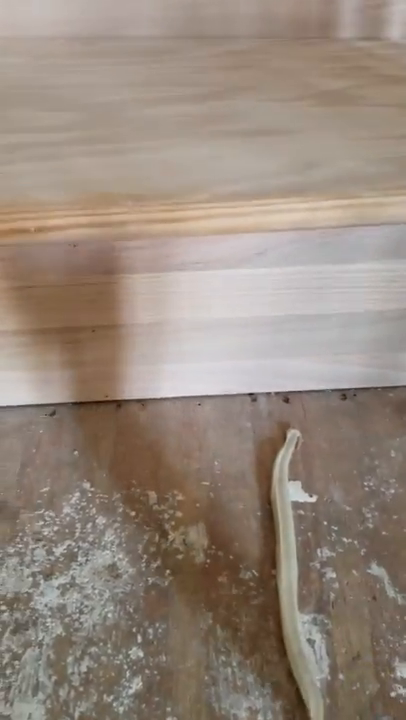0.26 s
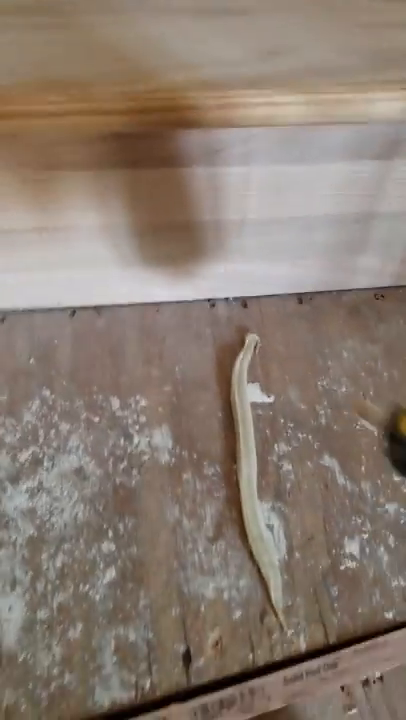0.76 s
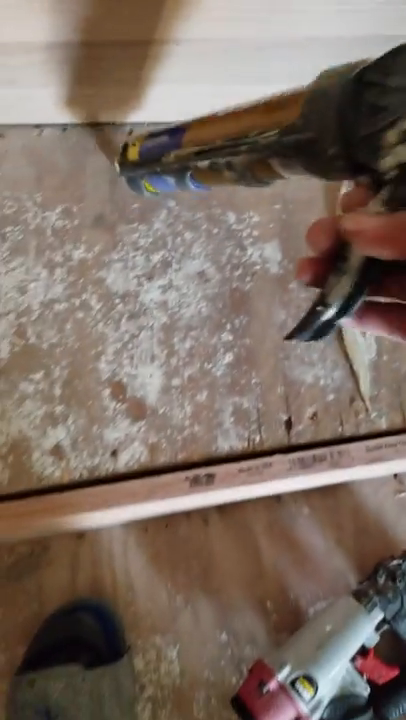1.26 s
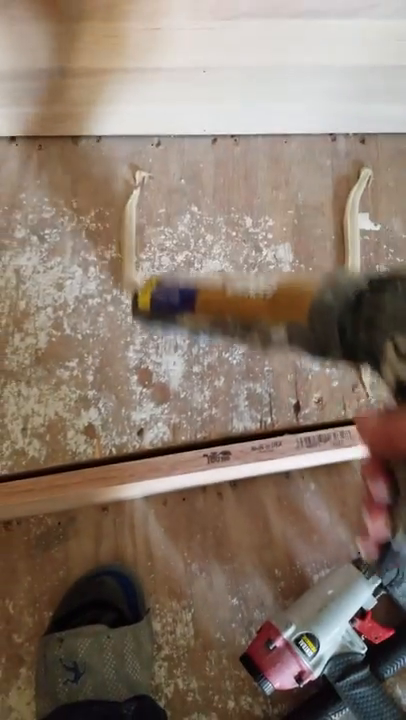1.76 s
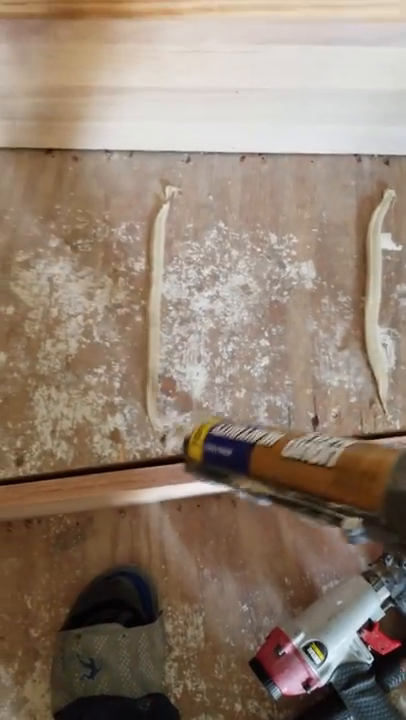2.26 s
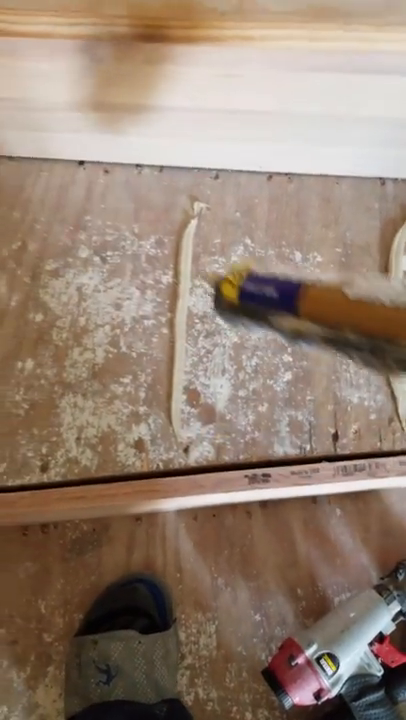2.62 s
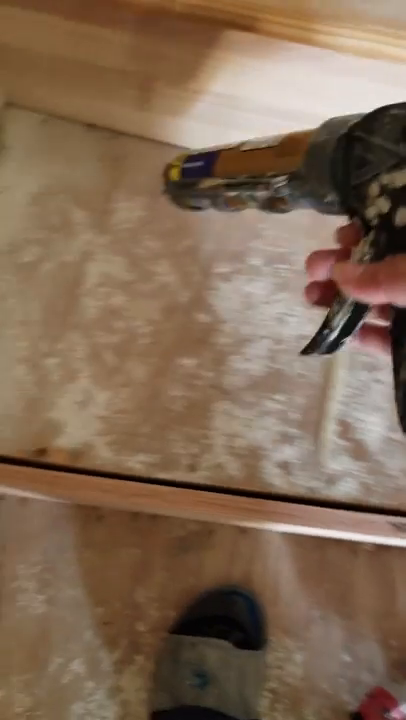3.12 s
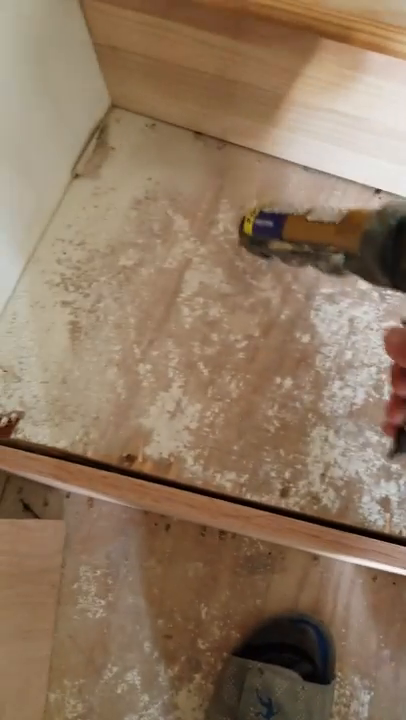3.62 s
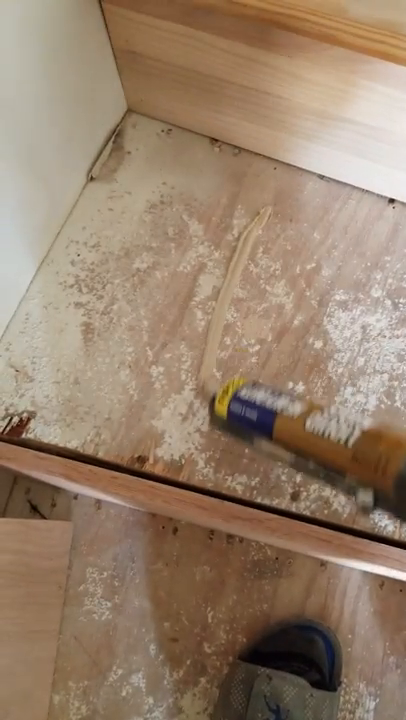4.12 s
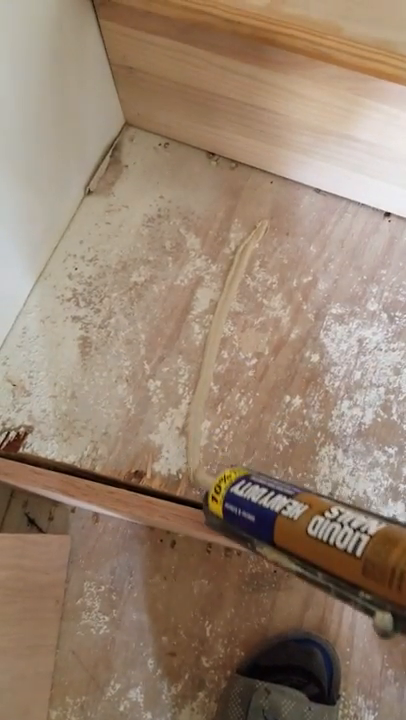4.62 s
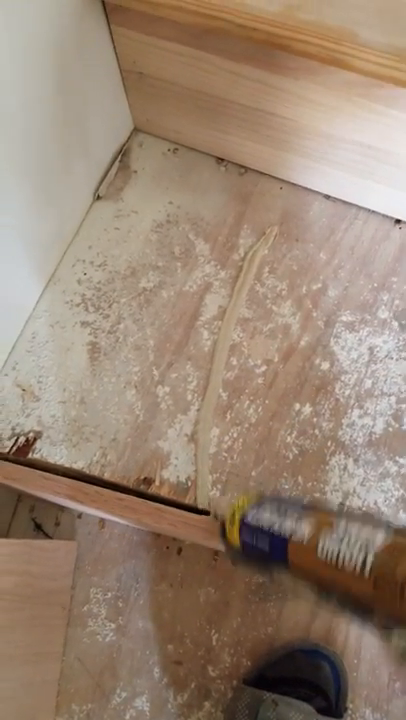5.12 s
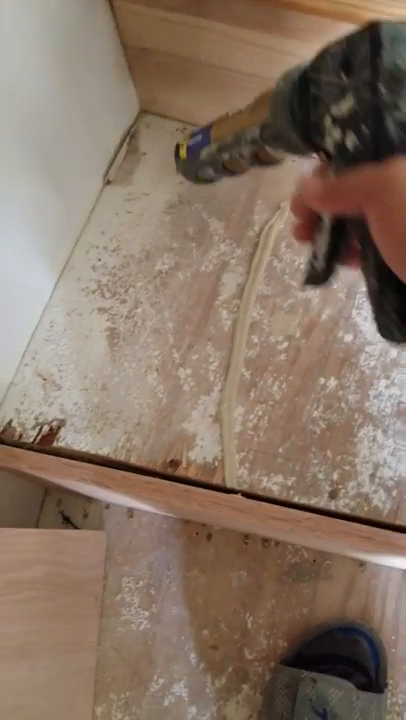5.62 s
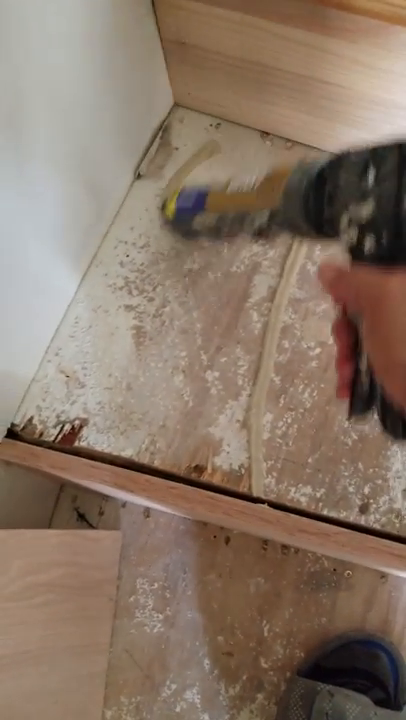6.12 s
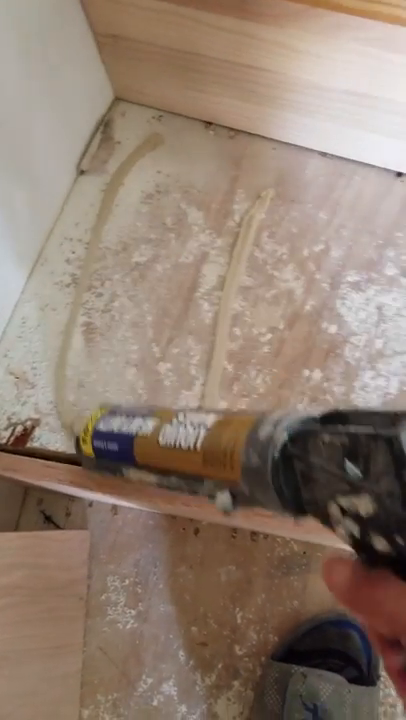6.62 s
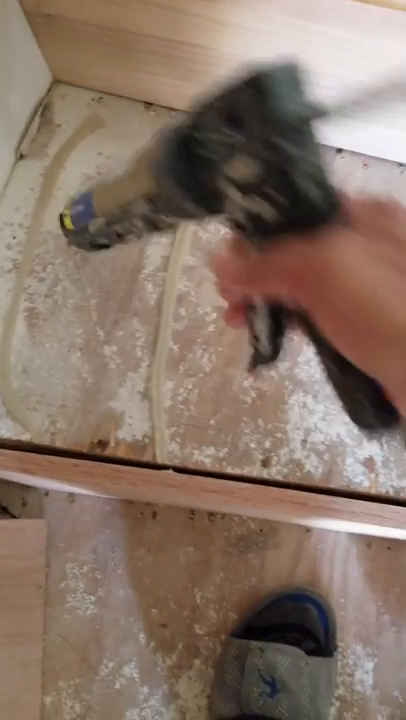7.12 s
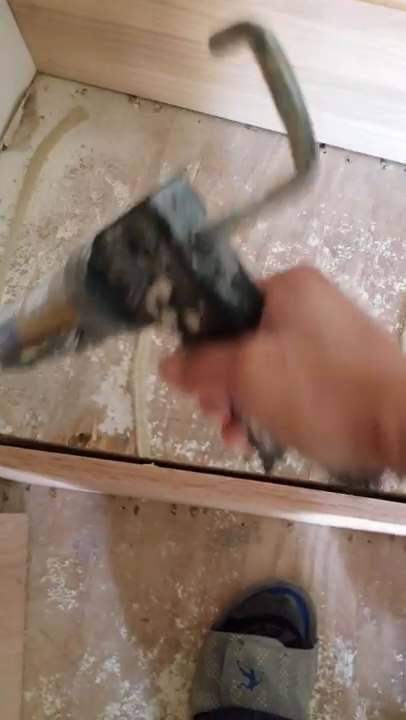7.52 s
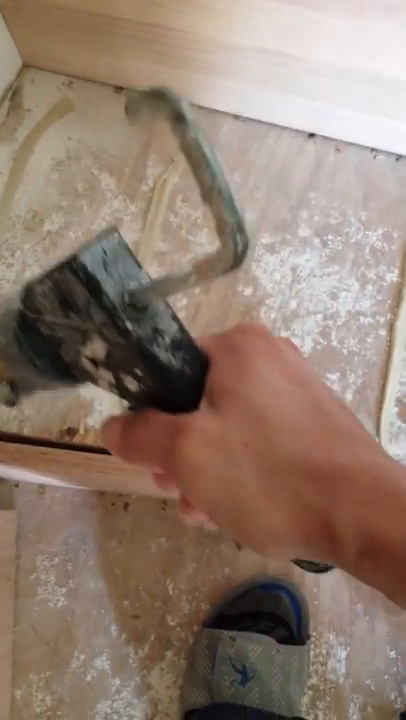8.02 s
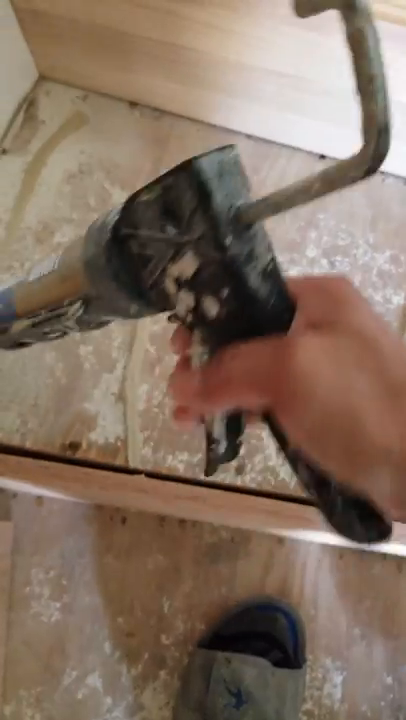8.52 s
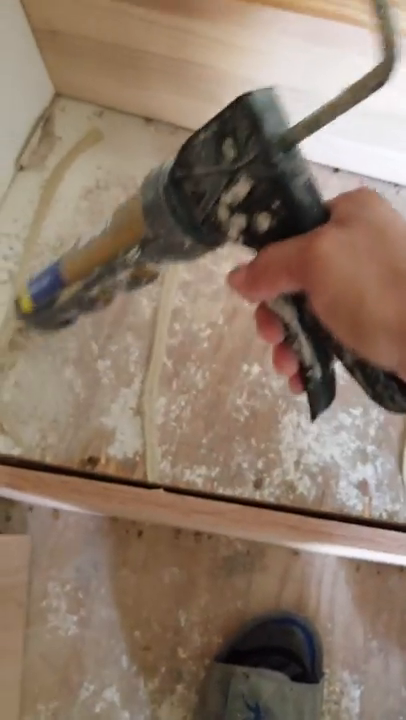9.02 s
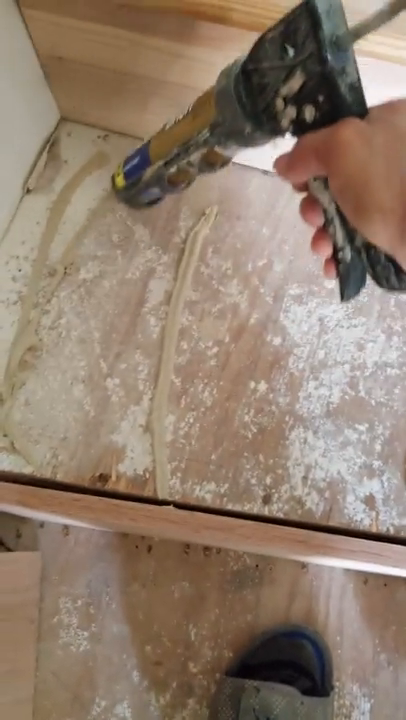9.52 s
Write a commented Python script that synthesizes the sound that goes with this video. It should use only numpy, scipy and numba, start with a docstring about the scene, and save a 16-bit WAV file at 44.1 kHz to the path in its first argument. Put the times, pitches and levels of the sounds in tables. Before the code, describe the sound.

A caulking gun is squeezed again and again in a small bare room, creaking in jerks between sharp metallic clicks, over low machine rumble and airy hiss.

```python
"""Caulking gun squeezed over a wooden floor in a small bare room, 9.8 s, heard by a phone with two microphones.
Throughout: far machine rumble and leaking-air hiss (shaped noise), the gun bumping the boards (dull bursts),
light metal ticks with faint scrapes. 0 s: a creak dies; 0.28 s: a bright snap (rattling noise rings steel modes).
From 1.36, 3.44, 5.78, 7.17 and 8.6 s: pulls; the plunger creaks in stick-slip jerks (scrapes ring the gun's
parts), the pawl clicks over a tooth; more snaps from 2.19 to 8.41 s, mostly the trigger against its stops."""
import sys
import numpy as np
from scipy import signal
from scipy.fft import rfft, irfft, next_fast_len
from scipy.io import wavfile
from scipy.ndimage import uniform_filter1d
from numba import njit

SR = 44100
rng = np.random.default_rng(int(sys.argv[2]) if len(sys.argv) > 2 else 0)


def generate_wav(signal):
    """Clip the signal to [-1, 1] and save it as 16-bit WAV at the path in sys.argv[1]."""
    frames = np.transpose(np.atleast_2d(signal))
    scaled = np.clip(frames, -1, 1) * 32767
    pcm = np.round(scaled).astype(np.int16)
    wavfile.write(sys.argv[1], SR, pcm)


N = 430416

# Levels are nominal: stage gains, the room and the output curve follow. Spectra are dB per Hz, relative.
# Rumble and hiss over time: time_s, rumble_db, hiss_db, hiss_peak_db, hiss_peak_hz
AIR = [(0.0, -56.5, -56, -53, 11500), (1.3, -53, -66, -49.5, 11160), (1.66, -46, -54, -44.5, 11200),
       (2.42, -50.5, -60, -47.5, 11070), (3.18, -48, -60.5, -47.5, 11000), (3.53, -44, -53, -51, 11900),
       (4.9, -47, -57.5, -51.5, 11860), (6.17, -50, -61, -52, 10600), (6.93, -53, -60, -60, 10800),
       (7.69, -49.5, -61.5, -59, 11370), (9.08, -49, -56.5, -67, 11100), (9.76, -49, -59.5, -62, 11500)]
# Rumble spectrum: freq_hz, density_db
RUMBLE_SPECTRUM = [(12, -58), (20, -24), (69, -5), (91, -6.5), (123, -1), (133, -3.5), (146, -5),
                   (172, -19.5), (248, -23), (300, -21), (399, -28), (507, -30.5), (624, -46), (767, -49),
                   (900, -68.5), (1170, -90), (1980, -120)]
# Wavering tones in the rumble: freq_hz, width_hz, level_db
HUM = [(80.7, 7.9, -9.5), (121.34, 3.5, -4), (136.2, 10.6, -8)]
# Hiss spectra, three bands: freq_hz, density_db
LOW_HISS_SPECTRUM = [(410, -44), (700, -10), (1140, -15), (1190, -9), (1790, -4), (3070, -9.5), (3160, -21),
                     (4000, -11.5), (4850, 1), (6330, -11.5), (8000, -33.5), (10400, -7), (17600, -120)]
MID_HISS_SPECTRUM = [(7000, -72), (7600, -11), (9000, -4), (10000, -1), (11500, -1.5), (12500, -12),
                     (13500, -32)]
HIGH_HISS_SPECTRUM = [(11500, -31), (12800, -4), (13800, -13), (15000, 0), (15650, -15), (15900, -56)]
# Side of the low hiss: freq_hz, left_minus_right_db
LOW_HISS_SIDES = [(700, -0.5), (1700, 6), (3500, 1.5), (5000, -6), (7000, 15)]
# Likeness of the two channels of noise: freq_hz, correlation (0..1)
LIKENESS = [(60, 1), (130, 0.93), (290, 0.8), (640, 0.59), (1400, 0.18), (3000, 0.025), (15000, 0.02)]
# Decay of the room: freq_hz, t60_s
ROOM_T60 = [(200, 0.62), (1000, 0.63), (3000, 0.6), (6000, 0.59), (12000, 0.31)]
# Nozzle and barrel against the boards: start_s, peak_db, t60_s
BUMPS = [(0.02, -44.5, 0.3), (0.257, -40.5, 0.067), (1.294, -39, 0.064), (1.305, -29, 0.11),
         (2.16, -36.5, 0.049), (3.182, -34, 0.31), (3.378, -23, 0.21), (5.069, -38, 0.19),
         (5.74, -37, 0.38), (5.796, -33.5, 0.069), (5.827, -31, 0.25), (7.248, -39, 0.13),
         (7.507, -38, 0.19), (7.995, -41.5, 0.05), (8.01, -39, 0.062), (8.217, -47.5, 0.12),
         (8.408, -45.5, 0.093), (8.718, -28, 0.11), (9.002, -41, 0.05), (9.016, -34.5, 0.21),
         (9.289, -41.5, 0.093), (9.365, -40.5, 0.05), (9.703, -39, 0.26)]
# Board spectrum: freq_hz, density_db
BOARD_SPECTRUM = [(110, -7.5), (190, -18.5), (227, -1), (291, 5), (356, -1), (550, -8), (700, -13.5),
                  (1090, -19.5), (1300, -24.5), (1690, -19), (2860, -120)]
# Light metal ticks and faint scrapes, some just before a snap: start_s, peak_db, scrape_s
TICKS = [(0.2529, -25.5, .036), (.543, -41, 0.023), (0.714, -46, .014), (1.306, -30, 0.037),
         (1.352, -27.5, 0.09), (2.16, -20.5, 0.064), (3.379, -24.5, .045), (3.439, -20.5, 0.085),
         (5.027, -23, 0.093), (5.071, -15.5, 0.024), (5.744, -32, 0.056), (5.777, -26.5, 0.11),
         (5.827, -21, 0.0064), (6.776, -30, 0.058), (7.176, -31.5, 0.037), (8.246, -33, 0.012),
         (8.391, -28.5, 0.098), (8.601, -28.5, 0.07), (9.754, -26, .026)]
# Tick spectrum: freq_hz, density_db
TICK_SPECTRUM = [(410, -39), (700, -13), (1250, -7.5), (1530, 3.5), (2320, 0.5), (2840, -2.5), (4640, -9.5),
                 (7270, -23.5), (9000, -14), (11700, -59), (19800, -120)]
# Broad bright snaps, mostly the trigger against its stops; 7.32 s may be the pawl: start_s, peak_db,
# left_minus_right_db, rattle_s, body_db, treble_db, ring_db (modes over 4.5 kHz)
SNAPS = [(.2791, -7, -5.5, 0.0034, 6, 15.6, -14), (2.1898, -4, -7.5, .0038, 2, 11, -23),
         (5.047, -4, -1.5, 0.0031, -2, 10.5, 7), (6.8019, -4.5, 1.5, 0.0042, -5, 1.3, -4.5),
         (6.8298, -6.5, -3, 0.00063, 0, 5.9, 6), (7.3186, -8, -0.5, 0.0042, -0.5, 11.3, -15),
         (8.4117, -5, -1, 0.0044, 5, 13, 7)]
# Snap spectrum: freq_hz, density_db
SNAP_SPECTRUM = [(180, -55), (300, -21.5), (898, -19), (1700, -0.5), (2830, -1), (4170, -4), (5020, -0.5),
                 (5940, -8), (7910, -11.5), (10400, -7.5), (14300, -11.5), (15500, -16), (16900, -34.5)]
# Snap modes: freq_hz, level_db, t60_s
SNAP_MODES = [(1600, -1.5, 0.0058), (2870, 2, 0.015), (4860, -29.5, 0.011), (10570, -4, 0.028)]
# Pawl over a tooth: columns as SNAPS
PAWL = [(1.7638, -4, -5, 0.0031, 1.5, 3, 1.5), (3.8258, -3, -3, 0.0023, -3.5, 4, 1),
        (6.0053, -5.5, -3, 0.0031, 1, 5.5, 2.5), (8.1104, -4.5, -.5, 0.0037, 2.5, 6, -9),
        (9.1453, -6, 0, 0.0033, -2, 2.5, -33)]
# Pawl spectrum: freq_hz, density_db
PAWL_SPECTRUM = [(350, -57), (600, -27.5), (1750, -15.5), (2340, -3), (2870, -11.5), (4520, -10.5),
                 (5260, -10.5), (6730, -17), (8160, -11.5), (10700, -20.5), (11700, -8), (16000, -27.5)]
# Pawl modes: freq_hz, level_db, t60_s
PAWL_MODES = [(2284, 8, 0.033), (2950, -14, 0.027), (4210, -13, 0.018), (5080, -4.5, 0.0093),
              (5263, 12, 0.014), (8400, -1, 0.015), (10300, 8, 0.015), (12000, -2, 0.032)]
# Dense creak, one list a pull: time_s, effort_db (frame level), tube_pitch_hz
CREAK = [
    [(0.0, -51.5, 1410), (.1, -61.5, 1430), (.15, -87, 1420)],
    [(1.36, -57, 1610), (1.49, -48, 1490), (1.668, -46.5, 1450), (1.776, -48.5, 1380), (1.922, -50, 1450),
     (2.0, -81.5, 1400)],
    [(3.44, -60, 1620), (3.55, -50.5, 1590), (3.742, -44.5, 1470), (3.922, -48.5, 1405), (4.162, -62, 1394),
     (4.33, -63, 1410)],
    [(5.78, -55, 1450), (5.94, -48, 1384), (6.146, -53, 1415), (6.256, -55, 1450), (6.416, -61, 1456),
     (6.62, -58.5, 1440)],
    [(7.17, -56.5, 1530), (7.236, -59.5, 1600), (7.53, -58, 1635), (7.7, -59, 1545), (7.73, -70, 1490),
     (7.768, -58.5, 1500), (7.926, -55.5, 1463), (7.99, -78.5, 1540), (8.1, -61, 1450), (8.2, -66, 1470)],
    [(8.6, -54, 1550), (8.77, -54, 1700), (8.88, -56.5, 1640), (8.92, -54.5, 1440), (9.022, -52, 1440),
     (9.124, -53, 1510), (9.32, -53.5, 1445), (9.428, -73, 1460), (9.562, -56.5, 1470), (9.62, -68, 1430)],
]
# Lone slips where the plunger slows: start_s, peak_db
SLIPS = [(1.922, -55), (3.9948, -52), (4.0194, -45), (4.058, -46.5), (4.0887, -50), (4.12, -44),
         (4.147, -46.5), (4.179, -46.5), (4.2066, -45), (4.2288, -45.5), (4.2473, -45), (4.2838, -43.5),
         (4.3764, -43.5), (4.5626, -54), (4.604, -44), (4.6258, -46), (6.3225, -49), (6.377, -50),
         (6.4107, -49), (6.4425, -49), (6.4636, -49), (6.537, -52.5), (6.601, -49.5), (7.2105, -51),
         (7.268, -51), (7.476, -52), (7.6784, -54), (7.698, -52), (7.741, -49.5), (7.815, -51),
         (7.942, -49), (8.0124, -45.5), (8.034, -46), (8.0595, -53), (8.081, -46.5), (9.0523, -60),
         (9.405, -45), (9.465, -43.5), (9.507, -49), (9.5333, -50.5), (9.5662, -48), (9.5987, -49)]
# Upper frame modes: freq_hz, width_hz, level_db
FRAME_MODES = [(3110, 160, -8.5), (4130, 540, 0), (5430, 195, -1), (5780, 590, -9.5)]
# Swell of the low parts under full strain: peak_s, half_length_s, grip_db, barrel_db
STRAIN = [(1.805, .4, -62, -52), (3.826, 0.3, -66, -47), (6.286, 0.5, -57.5, -50.5), (7.95, 0.42, -57, -92),
          (9.2, 0.56, -57, -60.5)]
# Tube level change as each full pull starts: change_db
SLACK_TUBE_DB = [-22, 8, -4, 5, 0]

# air
LOW_HISS_DB, HIGH_HISS_DB = -6, 0.5
HISS_SIDE_DB, HISS_SIDE_FIRST_DB, TURN_S = -6.5, -3, 1   # left minus right; extra at first, until the phone turns
FLOOR_ECHO_S, ECHO_SWAY_S, ECHO_DB = .003, .00008, -13
# room and output
ROOM_DB, CUTOFF_HZ = -7.5, 16100
CLACK_SEND_DB = -4   # clacks reach the walls more weakly than the soft sounds
# contacts: crest is peak over rms at the start
CLACK_CREST_DB, TICK_CREST_DB, BUMP_CREST_DB = 11.5, 15.5, 8.5
TICK_RATTLE_S, TICK_BRIGHT_DB = 0.0031, 7.5
# resonant parts
TUBE_WIDTH_HZ, BARREL_HZ, BARREL_WIDTH_HZ = 116, 335, 128
ROD_HZ, ROD_WIDTH_HZ, CRADLE_HZ, CRADLE_WIDTH_HZ = 2273, 250, 2855, 420
GRIP_HZ, GRIP_WIDTH_HZ = 1050, 145
TUBE_DB, ROD_DB, CRADLE_DB = -0.5, -1, -3.5   # against the frame, once loaded
# load and effort
LOADED_HZ = 1500   # the tube's pitch falls through this as the load comes on
LOAD_ROD_DB, LOAD_CRADLE_DB, LOAD_GRIP_DB = 0.5, -3, 2   # per 100 Hz of fall
SLIPS_PER_S, FULL_EFFORT_DB = 95, -48   # slip rate at full effort
SLIP_RATE_FOLLOWS, GRIP_FOLLOWS = .6, .5   # shares of the effort's dB swing
SLIP_HIGH_DB = -4   # higher parts against the tube in a lone slip
STRAIN_DROP_DB, STRAIN_SHAPE = 15, 1.6   # fall at half a length from the peak; squareness
SLACK_S, SLACK_ROD_DB, SLACK_CRADLE_DB = 0.082, 5.5, -8   # the rod speaks first in a pull


def amp(db):
    """Gain of a level in dB."""
    return 10 ** (np.asarray(db) / 20)


def rms_one(x):
    """Scaled to rms 1."""
    return x / np.sqrt(np.mean(x ** 2) + 1e-30)


def at_hz(points, hz):
    """A (freq_hz, value) table read on a log-frequency axis."""
    table = np.array(points)
    return np.interp(np.log(hz + 1), np.log(table[:, 0]), table[:, 1])


def sides(db):
    """Left and right gains of a left-right difference."""
    return np.array([amp(db / 2), amp(-db / 2)])


def noise(spectrum, size, sides_db=((100, 0), (200, 0))):
    """Stereo noise of a spectrum, channels alike in the bass only; rms of their mean is 1."""
    padded = next_fast_len(size, True)
    hz = np.fft.rfftfreq(padded, 1 / SR)
    mid, side = rfft(rng.standard_normal((2, padded)))
    alike = np.clip(at_hz(LIKENESS, hz), 0, 1)
    mid, side = mid * np.sqrt(1 + alike), side * np.sqrt(1 - alike)
    gain = amp(at_hz(spectrum, hz)) * sides(at_hz(sides_db, hz))
    out = irfft(np.array([mid + side, mid - side]) * gain, padded)[:, :size]
    return out / np.std(out.mean(axis=0))


def resonance(x, hz, width_hz):
    """Two-pole peak of gain 1."""
    r = np.exp(-np.pi * width_hz / SR)
    zeros = [(1 - r * r) / 2, 0, (r * r - 1) / 2]
    return signal.lfilter(zeros, [1, -2 * r * np.cos(2 * np.pi * hz / SR), r * r], x)


@njit
def two_pole(x, twice_cos, r):
    """Recursion of a peak whose centre moves."""
    out = np.zeros(len(x))
    for i in range(2, len(x)):
        out[i] = x[i] - x[i - 2] + r * twice_cos[i] * out[i - 1] - r * r * out[i - 2]
    return out


def gliding_resonance(x, hz, *widths_hz):
    """Peaks in a row on one centre that may move, each scaled to pass white noise at its level."""
    twice_cos = 2 * np.cos(2 * np.pi * hz / SR) * np.ones(N)
    for width_hz in widths_hz:
        r = np.exp(-np.pi * width_hz / SR)
        x = np.array([two_pole(c, twice_cos, r) for c in x]) * np.sqrt((1 - r * r) / 2)
    return x


def evened(x):
    """Level held near rms 1 over a tenth of a second."""
    return x / np.sqrt(uniform_filter1d(x ** 2, SR // 10) + 1e-12)


def uneven_steps(spread_db, hold):
    """Random gains, each held for some samples."""
    return np.repeat(amp(rng.normal(0, spread_db, N // hold + 1)), hold)[:N]


def rumble(white, rumble_db):
    """Far machine: low shaped noise plus narrow bands of noise that waver like tones."""
    hum = 0
    for hz, width_hz, db in HUM:
        tone = resonance(resonance(white, hz, width_hz), hz, 30)
        hum = hum + amp(db) * rms_one(tone)
    return (noise(RUMBLE_SPECTRUM, size=N) * amp(-3.0) + hum) * amp(rumble_db)


def hiss(white, hiss_db, peak_db, peak_hz):
    """Leaking air: turbulence noise with a gliding peak, combed by a floor echo; its side shifts."""
    upper = noise(MID_HISS_SPECTRUM, size=N) + noise(HIGH_HISS_SPECTRUM, size=N) * amp(HIGH_HISS_DB)
    upper = upper * amp(hiss_db) + gliding_resonance(white, peak_hz, 490) * amp(peak_db - 4.0)
    sway = np.interp(np.arange(N), np.linspace(0, N, 12), rng.standard_normal(12))
    late = np.arange(N) - np.round(SR * (FLOOR_ECHO_S + ECHO_SWAY_S * sway)).astype(int)
    upper = upper + amp(ECHO_DB) * upper[:, late % N]
    pan_db = HISS_SIDE_DB + HISS_SIDE_FIRST_DB * np.exp(-np.arange(N) / SR / TURN_S)
    lower = noise(LOW_HISS_SPECTRUM, size=N, sides_db=LOW_HISS_SIDES) * amp(hiss_db + LOW_HISS_DB)
    return lower + upper * sides(pan_db)


def background():
    """Rumble and hiss, their levels drifting by table."""
    time_s, *columns = np.transpose(AIR)
    rumble_db, hiss_db, peak_db, peak_hz = [np.interp(np.arange(N) / SR, time_s, c) for c in columns]
    white = rng.standard_normal((2, N))
    return rumble(white[0], rumble_db) + hiss(white, hiss_db, peak_db, peak_hz)


def room(x):
    """Bare walls: a stereo noise tail that dies band by band."""
    size, tail = 30000, 0
    t, white = np.arange(size) / SR, noise([(100, 0.0058), (200, 0)], size=size)
    for low_hz in 180 * 2. ** np.arange(0, 6.5, .5):   # half octaves
        sos = signal.butter(2, [low_hz, low_hz * np.sqrt(2)], "band", fs=SR, output="sos")
        tail = tail + signal.sosfilt(sos, white) * amp(-60 * t / at_hz(ROOM_T60, low_hz * 1.31))
    tail = tail * np.clip((t - .004) / 0.0035, 0, 1)   # gap before the first reflections
    tail = tail / np.sqrt(np.sum(tail ** 2) / 2)
    return signal.fftconvolve(x.mean(axis=0)[None], tail)[:, :N]


def bumps():
    """A soft contact shakes the boards: a dull burst that dies fast."""
    size = 16384
    out, t = np.zeros((2, N + size)), np.arange(size) / SR
    for start_s, db, t60_s in BUMPS:
        thud = noise(BOARD_SPECTRUM, size=size) * amp(-60 * t / t60_s) * np.minimum(t / 0.00089, 1)
        at = round(start_s * SR)
        out[:, at:at + size] += amp(db - BUMP_CREST_DB) * thud / np.std(thud[:, :500])
    return out[:, :N]


def ticks():
    """Light metal ticks: a few ms of noise, each dragging a faint scrape."""
    size = 8192
    out, t = np.zeros((2, N + size)), np.arange(size) / SR
    tilt = [(2000, 0), (4500, TICK_BRIGHT_DB)]
    spectrum = [(hz, db + at_hz(tilt, hz)) for hz, db in TICK_SPECTRUM]
    for start_s, db, scrape_s in TICKS:
        decay = np.exp(-t / TICK_RATTLE_S) + amp(-5.0) * np.exp(-(t / scrape_s) ** 2)
        tick = noise(spectrum, size=size) * np.minimum(t / 0.0012, 1) * decay
        at = round(start_s * SR)
        out[:, at:at + size] += tick * amp(db - TICK_CREST_DB) * sides(-2.0)[:, None]
    return out[:, :N]


def clacks(table, spectrum, modes, fade_s, after_db, after_s):
    """Steel on steel: ms of rattling contacts, a shiver after, and the modes they set ringing."""
    size = 8192
    out, t = np.zeros((2, N + size)), np.arange(size) / SR
    for start_s, db, pan_db, rattle_s, body_db, treble_db, ring_db in table:
        tilt = [(1400, body_db), (2400, 0), (11000, treble_db)]
        tilted = [(hz, v + at_hz(tilt, hz)) for hz, v in spectrum]
        rattle = np.exp(-np.maximum(t - rattle_s, 0) / fade_s)
        shiver = amp(after_db) * np.exp(-t / after_s)
        hit = noise(tilted, size=size) * np.minimum(t / 0.001, 1) * (rattle + shiver)
        for hz, mode_db, t60_s in modes:
            gain = amp(ring_db * (hz > 4500) + mode_db)
            hit = hit + gain * resonance(hit, hz, np.log(1000) / np.pi / t60_s)
        level = amp(db - CLACK_CREST_DB) / np.std(hit[:, :220].mean(axis=0))
        at = round((start_s - .0003) * SR)   # lead for the attack
        out[:, at:at + size] += hit * level * sides(pan_db)[:, None]
    return out[:, :N]


def snaps():
    """Broad bright snaps, mostly the trigger hitting its stops: short rattle, strong shiver."""
    return clacks(SNAPS, SNAP_SPECTRUM, SNAP_MODES, fade_s=0.0009, after_db=0.5, after_s=0.0076)


def pawl_clicks():
    """Pawl dropping over a ratchet tooth: longer ring, weak shiver."""
    return clacks(PAWL, PAWL_SPECTRUM, PAWL_MODES, fade_s=0.0016, after_db=-10.5, after_s=0.012)


def pulls(tables):
    """Columns of per-pull tables in time; levels drop to -100 dB between pulls, pitches carry over."""
    def hush(time_s, row):
        return (time_s, *[v if v > 0 else -100 for v in row[1:]])   # levels are the negative values

    rows = np.concatenate([[hush(p[0][0] - .008, p[0]), *p, hush(p[-1][0] + 0.016, p[-1])] for p in tables])
    return [np.interp(np.arange(N) / SR, rows[:, 0], c) for c in rows.T[1:]]


def strain():
    """Grip and barrel levels: one swell a full pull."""
    t = np.arange(N) / SR
    swells = []
    for peak_s, half_s, grip_db, barrel_db in STRAIN:
        drop_db = STRAIN_DROP_DB * np.abs((t - peak_s) / half_s) ** STRAIN_SHAPE
        swells.append(np.array([[grip_db], [barrel_db]]) - drop_db)
    return np.maximum(np.max(swells, axis=0), -120)


def slack():
    """1 as a pull begins, dying as the load comes on; and the tube's level change meanwhile."""
    t, starts = np.arange(N) / SR, np.array([-1] + [p[0][0] for p in CREAK[1:]])
    pull = np.searchsorted(starts, t + .01) - 1
    loose = np.exp(-(np.maximum(t - starts[pull], 0) / SLACK_S) ** 2)
    return loose, loose * np.array([0, *SLACK_TUBE_DB])[pull]


def slip_train(effort_db, scrape):
    """Dense stick-slip: uneven impulses, slower at low effort; returns them and their scrapes."""
    uneven = uneven_steps(1.5, 300)
    rate = SLIPS_PER_S * amp(SLIP_RATE_FOLLOWS * np.clip(effort_db - FULL_EFFORT_DB, -15, 5))
    count = np.floor(np.cumsum(rate * uneven) / SR)
    slips = np.diff(count, prepend=0) * amp(rng.normal(0, 1.8, N))
    return slips, evened(signal.fftconvolve(slips, scrape)[:N] + 0.54)   # offset: steady rubbing


def lone_slips(scrape):
    """Single scrapes as the plunger slows: drive for the low and the higher parts."""
    lone = np.zeros((2, N))
    for start_s, db in SLIPS:
        lone[:, round(start_s * SR)] = amp(db), amp(db + SLIP_HIGH_DB)
    return signal.fftconvolve(lone, scrape[None])[:, :N]


def frame_ring(x):
    """Upper frame modes, alternating in sign."""
    return sum(amp(db) * resonance(x, hz, width_hz) * (-1) ** k
               for k, (hz, width_hz, db) in enumerate(FRAME_MODES))


def creak():
    """The plunger sticks and slips; each slip is a short scrape that rings the parts of the gun."""
    effort_db, tube_hz = pulls(CREAK)
    grip_db, barrel_db = strain()
    loose, tube_slack_db = slack()
    load = (LOADED_HZ - tube_hz) / 100
    grip_db = grip_db + LOAD_GRIP_DB * load + GRIP_FOLLOWS * np.clip(effort_db - FULL_EFFORT_DB, -25, 0)
    tube_db = effort_db + TUBE_DB + tube_slack_db
    rod_db = effort_db + ROD_DB + LOAD_ROD_DB * load + SLACK_ROD_DB * loose
    cradle_db = effort_db + CRADLE_DB + LOAD_CRADLE_DB * load + SLACK_CRADLE_DB * loose

    t = np.arange(900) / SR
    scrape = np.minimum(t / 0.001, 1) * np.exp(-t / 0.0059)
    slips, dense = slip_train(effort_db, scrape)
    low, high = lone_slips(scrape)
    grit = noise([(100, 0), (200, 0.02)], size=N)
    kicked = 0.81 * grit * dense + 0.71 * evened(slips)   # each slip starts with a clean kick

    def part(db, jolt, hz, width_hz):
        drive = kicked * amp(db) + grit * jolt
        return amp(-15.0) * gliding_resonance(drive, hz, width_hz, 450)   # broad second peak darkens valleys

    tube = part(tube_db, 1.19 * low, tube_hz, TUBE_WIDTH_HZ)
    rod = part(rod_db, 1.2 * high, ROD_HZ, ROD_WIDTH_HZ)
    cradle = part(cradle_db, 1.07 * high, CRADLE_HZ, CRADLE_WIDTH_HZ)
    grip = part(grip_db, 0.3 * low, GRIP_HZ, GRIP_WIDTH_HZ)
    frame = frame_ring(grit * (dense * amp(effort_db) + 1.57 * high)) / np.std(frame_ring(grit))
    knocks = grit * uneven_steps(2.8, 900) * amp(barrel_db - 5.5)   # the barrel knocks unevenly
    barrel = resonance(gliding_resonance(knocks, BARREL_HZ, BARREL_WIDTH_HZ), BARREL_HZ, 386)
    return (tube - rod + cradle - grip + frame) * sides(-1.4)[:, None] + barrel * amp(3.5)


def scene():
    """The gun in the room, over the background."""
    clack = pawl_clicks() + snaps()
    soft = bumps() + ticks() + creak()
    to_walls = soft + amp(CLACK_SEND_DB) * clack
    return background() + amp(ROOM_DB) * room(to_walls) + clack + soft


def record(dry):
    """Peaks are rounded, the top is cut."""
    rounded = 1.259 * np.tanh(dry / 1.145)
    return signal.sosfilt(signal.cheby2(16, 70, CUTOFF_HZ, fs=SR, output="sos"), rounded)


dry = scene()
out = record(dry)
generate_wav(out)
```